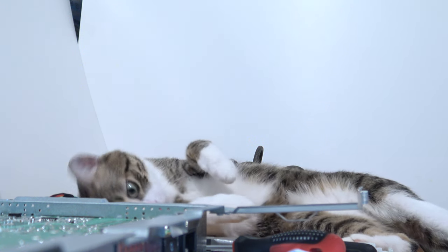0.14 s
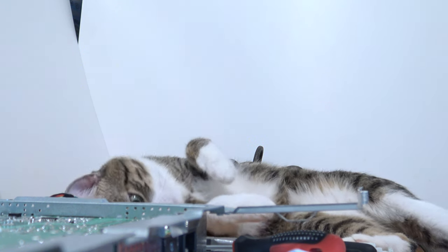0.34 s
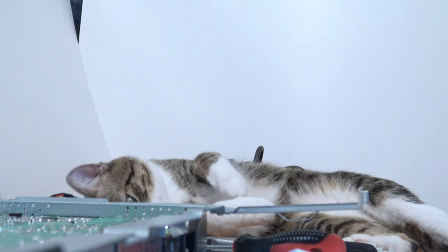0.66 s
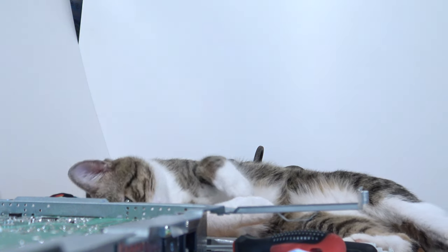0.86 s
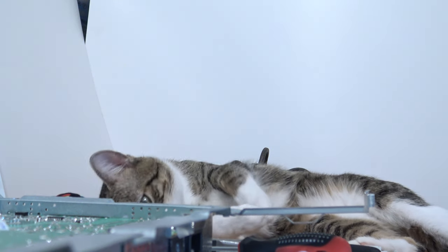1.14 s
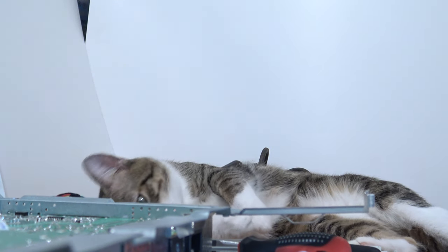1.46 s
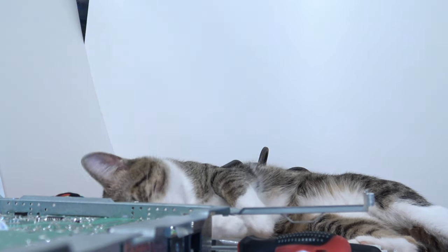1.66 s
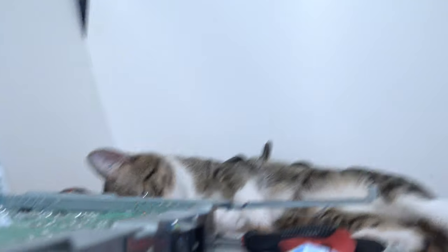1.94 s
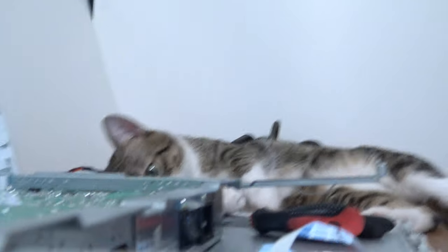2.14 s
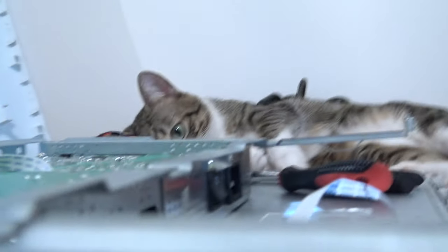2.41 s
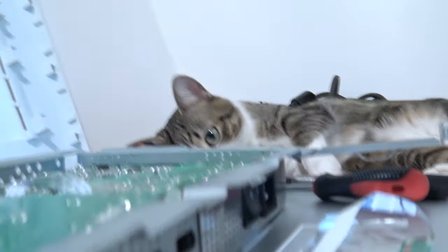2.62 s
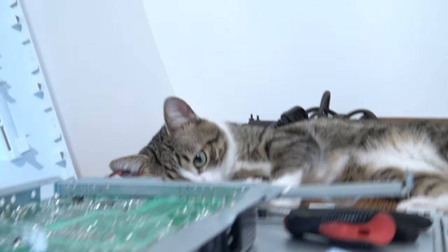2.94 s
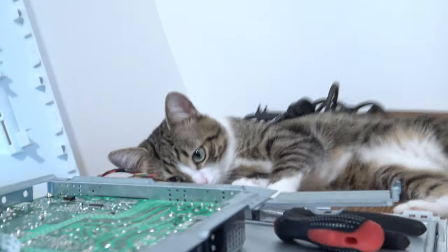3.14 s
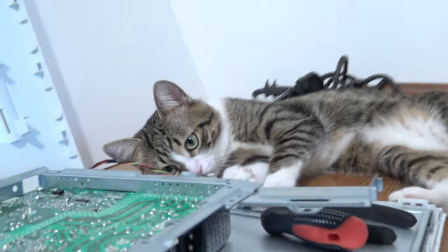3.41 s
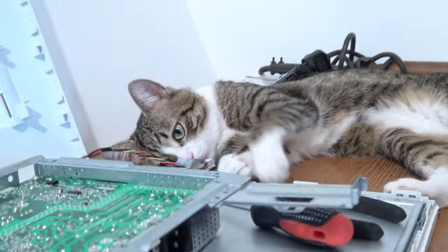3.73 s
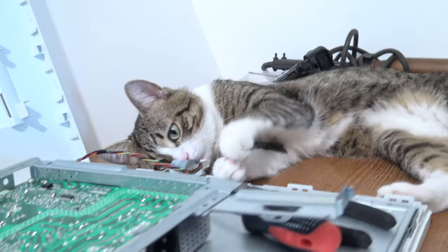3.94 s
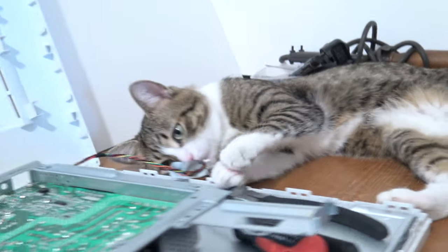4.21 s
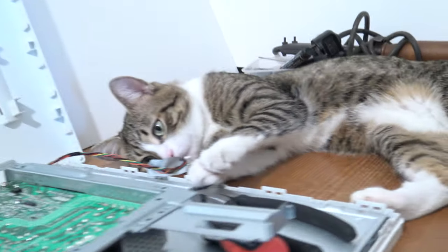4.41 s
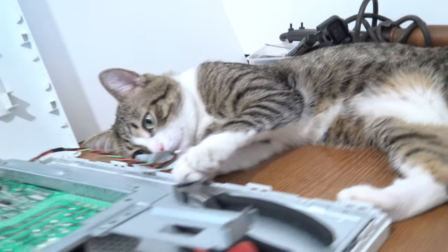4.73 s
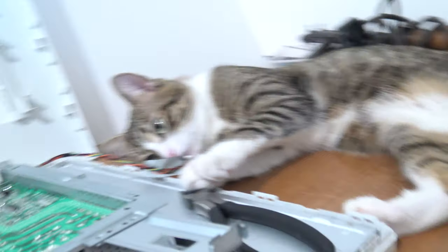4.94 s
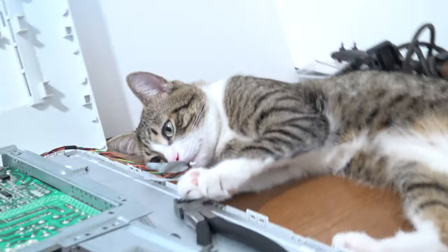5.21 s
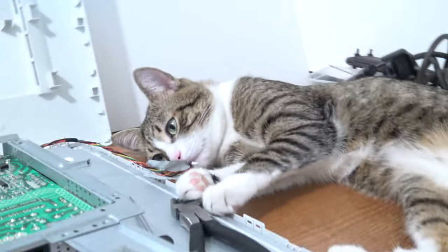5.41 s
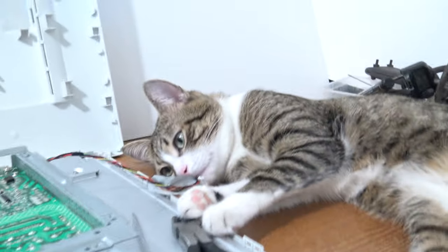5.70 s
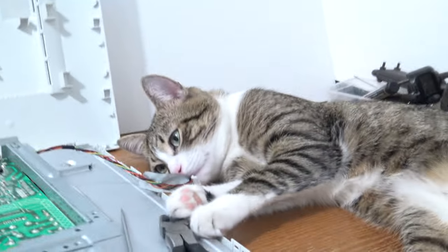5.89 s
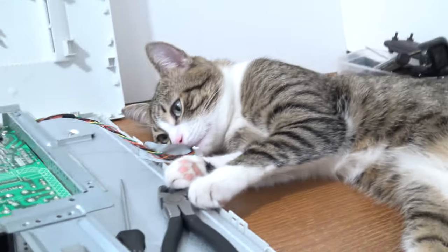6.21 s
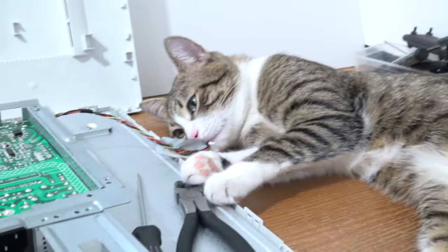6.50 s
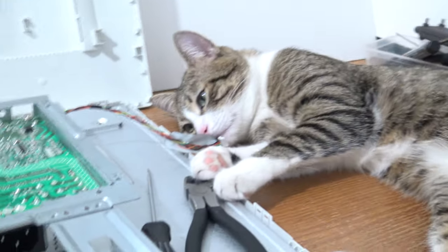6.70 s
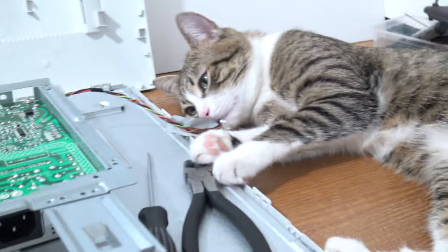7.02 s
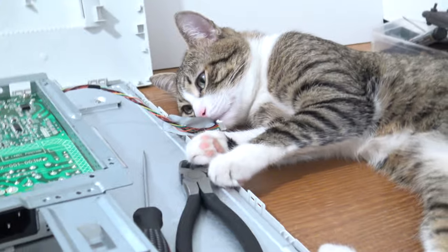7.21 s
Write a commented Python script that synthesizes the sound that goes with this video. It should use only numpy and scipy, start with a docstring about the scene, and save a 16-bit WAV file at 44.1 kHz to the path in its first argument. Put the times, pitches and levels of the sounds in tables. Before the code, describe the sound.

In a quiet small room, a close hand-held microphone hears a cat nudging a metal frame and loose tools. Almost nothing at first, then a few faint ticks, a dense rattling flurry with scrapes around two seconds, a couple of loud sharp knocks, then scattered single clacks and soft paw thuds on wood. Faint hiss lies underneath.

```python
"""A small bare room with a wooden floor: a cat lies among wires, tools and a sheet-metal frame.
Claws and loose parts tap the frame: short pitched swings, rattling noise and weak ringing.
Paws and fur drag in grains of noise with low thumps; paws thud on the boards, and the room echoes.
Underneath lie shaped noise for room tone and microphone hiss, a narrow noisy hum, and the faint
switched tones of the focus motor in a close, hand-held camera."""
import sys
import numpy as np
from scipy import signal
from scipy.fft import rfft, irfft, next_fast_len
from scipy.io import wavfile
from scipy.ndimage import uniform_filter1d

SR = 44100
rng = np.random.default_rng(int(sys.argv[2]) if len(sys.argv) > 2 else 0)


def dump(signal):
    """Clip the signal to [-1, 1] and save it as 16-bit WAV at the path in sys.argv[1]."""
    limited = np.clip(np.atleast_2d(signal).T, -1, 1)
    pcm = np.round(limited * 32767).astype(np.int16)
    wavfile.write(sys.argv[1], SR, pcm)


N = 324135  # length in samples

# Room tone and hiss: (frequency [Hz], relative level per Hz [dB])
TONE_SPECTRUM = [(20, -29), (35, -15.5), (50, 3.5), (95, -8), (140, 1), (240, -7), (310, -2), (420, -6),
                 (950, -8), (1400, -16), (1700, -14), (3200, -19), (14900, -21), (16500, -32)]
TONE_DB = -64
# A wash of air: (frequency [Hz], relative level per Hz [dB])
WASH_SPECTRUM = [(40, 1), (300, -2), (1500, -5), (2500, -13), (9000, -16), (16000, -29)]
# Left-right likeness of the tone and the wash: (frequency [Hz], likeness [0 to 1])
LIKENESS = [(60, 1), (180, 0.73), (550, 0.88), (1650, 0.93), (4970, 0.92), (15000, 0.46)]
# A narrow hum in the room: (frequency [Hz], width [Hz], level before the changes below [dB])
HUM = (1165, 48, -72.5)
# As the camera is carried round: (time [s], wash level [dB], hum change [dB])
CARRY = [(0, -68.5, -4), (.3, -64, -19), (0.651, -68, -5), (2.6, -72.5, -13), (3.5, -67, -1),
         (7.35, -78, -1)]

# Drags of paws and fur; levels are those before the stroke shapes them:
# (time [s], rise [s], time to fall 20 dB [s], scrape level [dB], scrape pitch [Hz],
#  thump level [dB], fur hiss level [dB]); very short or negative rises and falls get a floor in drag()
DRAGS = [(0.25, 0.042, -0.27, -66, 1500, -64, -61.5), (0.938, 0.024, 0.03, -54.5, 890, -52.5, -60.5),
         (0.975, 0.023, 0.14, -51.5, 1030, -49, -64.5), (1.711, 0.0052, 0.07, -51, 745, -71, -49.5),
         (1.873, 0.013, 0.22, -47.5, 1160, -46.5, -61), (1.926, 0.026, 0, -52, 890, -48, -86),
         (2.047, 0.0033, 0.0753, -45.5, 1220, -47.5, -56), (2.143, .01, 0.9, -76, 2760, -61, -62.5),
         (2.202, 0.0048, 0.2, -49.5, 860, -54.5, -57.5), (2.231, 0.0085, 0.01, -52.5, 1210, -55, -72),
         (2.288, .01, 0.02, -50.5, 920, -47.5, -62), (2.378, 0.023, 0.19, -55, 1190, -56, -61.5),
         (3.845, 0.023, -0.06, -45, 1190, -38, -50.5), (3.974, 0.006, 0.07, -53.5, 1280, -72.5, -66),
         (6.415, 0.013, 0.18, -68.5, 2330, -62.5, -66.5), (6.662, 0.04, 0.0546, -46.5, 1080, -66, -88),
         (6.871, 0.0051, 0.07, -52.5, 2380, -78, -69)]
# A heavier drag holds longer and thumps lower; each pair is (light, heavy)
LIGHT_DB, HEAVY_DB = -47, -37.5  # thump level
HOLD_S, THUMP_HZ = (0.011, 0.069), (270, 169)
# Ways the metal frame rings: (frequency [Hz], relative level [dB])
FRAME_MODES = [(300, -33), (680, 4.5), (830, 6), (960, 0.5), (1250, -1), (2160, 3.5), (2650, 7), (3600, 2),
               (5050, 3), (6450, -0.5)]

# How long the room's echo takes to fall 60 dB: (frequency [Hz], time [s])
ROOM_DECAY = [(200, 0.26), (1500, 0.17), (5000, 0.21), (15000, 0.15)]

# Taps of claws and loose parts on the frame:
# (time [s], knock pitch [Hz], knock peak [dB], click pitch [Hz], click peak [dB])
TAPS = [(0.8235, 910, -65, 5330, -58.5), (0.8882, 426, -65, 10200, -53), (0.8972, 433, -66, 9720, -49.5),
        (0.9124, 980, -46, 2740, -37.5), (0.9174, 1010, -41.5, 5550, -39.5), (0.9549, 680, -54, 5940, -51),
        (1.7763, 1430, -46.5, 2280, -34), (1.849, 850, -28.5, 1600, -37), (1.8854, 1340, -41, 2600, -38),
        (1.9063, 950, -31.5, 2440, -30.5), (1.9498, 520, -33, 2400, -38.5), (2.014, 756, -42, 2200, -22),
        (2.0458, 756, -25.5, 2080, -21.5), (2.0489, 780, -37, 4150, -22.5), (2.1507, 700, -58, 4200, -47),
        (2.2128, 684, -33.5, 2960, -39), (2.244, 660, -39.5, 1870, -42), (2.2835, 1180, -35, 2270, -37),
        (2.2997, 786, -46, 9700, -45), (2.3247, 695, -52, 6500, -45), (2.3754, 1030, -62, 4560, -45),
        (2.404, 690, -42.5, 5000, -36.5), (2.476, 917, -28.5, 3490, -16), (2.567, 700, -66, 8500, -56),
        (2.6063, 917, -16, 1690, -16.5), (2.6452, 1314, -32, 2570, -22.5), (2.7428, 935, -49.5, 2090, -36),
        (3.1581, 1145, -21.5, 6580, -15.5), (3.313, 1260, -49.5, 3220, -47.5),
        (3.492, 765, -52.5, 2930, -46), (3.7667, 1270, -45.5, 5260, -41), (3.8388, 700, -59, 6630, -48),
        (3.95, 1160, -48.5, 7050, -43.5), (3.9869, 920, -36.5, 1640, -55), (4.38, 1490, -52, 1580, -58),
        (4.3848, 930, -46.5, 1580, -60), (4.5275, 1320, -53, 3630, -46), (4.5937, 700, -61, 3950, -44),
        (4.8183, 930, -50, 1820, -60), (4.8685, 940, -22, 2960, -28.5), (4.9229, 790, -47, 1680, -50.5),
        (5.2072, 970, -46.5, 2580, -39), (5.2577, 1070, -51, 2220, -48), (5.702, 920, -21.5, 1680, -22),
        (6.2874, 1090, -52.5, 1930, -60), (6.3725, 824, -31.5, 3090, -35), (6.4143, 840, -46, 2190, -60),
        (6.6969, 855, -40, 2060, -41), (6.7178, 950, -28.5, 1640, -46), (7.207, 1330, -44.5, 2300, -32)]
# Harder contacts click higher and tick louder; without extra firmness, tick equals click at EVEN_HZ
EVEN_HZ, TICK_DB_PER_OCTAVE = 4220, 13
FIRM_DB, TICK_PER_DB = -31, 1.08  # knocks above FIRM_DB sharpen the tick further (dB per dB)
TICK_TOP_DB = 2.5  # the most that a tick stands over its click

# Thuds of a paw on the boards: (time [s], knock peak [dB])
THUDS = [(1.0112, -46), (2.309, -43), (2.838, -54), (3.6859, -53), (4.553, -31), (4.6407, -40.5),
         (6.0451, -32.5)]
# Pads are soft: the click lies far under the knock
THUD_HZ, THUD_CLICK_HZ, THUD_CLICK_DB = 343, 2820, -20.5

# Thin tones of the focus motor: (frequency [Hz], level before the motor's gain and changes [dB])
MOTOR_TONES = [(6475.5, -84), (8076, -81), (9676.5, -85), (11277, -99)]
# How strongly the motor sounds: (time [s], level change [dB])
MOTOR_RUN = [(2.55, -29.5), (2.7, -9), (3.0, -7), (3.3, -2), (3.8, -2.5), (3.9, -22)]
STEP_HZ, STEP_ON, STEP_START = 25, .44, .74  # bursts a second, share on, start as part of a cycle

# Balance of the two microphone ports: (frequency [Hz], left minus right [dB])
PORT_LEAN = [(60, 0), (110, 2), (200, -2), (380, -1.5), (700, -3.5), (1290, -2.5), (2380, 1.5),
             (4400, -0.5), (8120, 0), (15000, -0.5)]
EDGE_HZ = 16450  # the sound is cut above this


def gain_of(db):
    """Turns decibels into a multiplier."""
    return 10 ** (np.asarray(db) / 20)


def evened(x):
    """Scales a sound to an rms (average strength) of 1."""
    return x / np.sqrt(np.mean(x ** 2) + 1e-20)


def peaked(x):
    """Scales a sound to a peak of 1."""
    return x / (abs(x).max() + 1e-20)


def read(points, hz):
    """Reads between the points of a frequency table, on a log axis."""
    f, value = np.transpose(points)
    return np.interp(np.log(hz + 1), np.log(f + 1), value)


def band(x, low_hz, high_hz, order):
    """Keeps the frequencies between two edges."""
    edges = (low_hz, min(high_hz, SR / 2.1))
    return signal.sosfilt(signal.butter(order, edges, "band", fs=SR, output="sos"), x)


def wavelet(hz, cycles, t):
    """A swing that builds and dies within a few cycles."""
    u = t * hz / cycles
    return peaked(u * np.exp(-u) * np.sin(2 * np.pi * hz * t))


def add(mix, s, sound):
    """Mixes a sound in, starting at s seconds."""
    part = mix[:, round(s * SR):][:, :sound.shape[1]]
    part += sound[:, :part.shape[1]]


def airy(spectrum, patchy_db):
    """Stereo noise built from short random spectra, with drifting louder and softer patches."""
    frames, hz = N // 256 + 5, np.fft.rfftfreq(1024, 1 / SR)
    a, b, c, d, patches = rng.standard_normal((frames, 513, 5)).T
    patches = uniform_filter1d(patches, size=10, axis=0)
    patches = evened(uniform_filter1d(patches, size=12, axis=1))
    same = np.clip(read(LIKENESS, hz), -1, 1)[:, None]
    left = a + 1j * b
    right = same * left + np.sqrt(1 - same ** 2) * (c + 1j * d)
    level_db = read(spectrum, hz)[:, None] + patchy_db * patches
    spectra = np.array([left, right]) * gain_of(level_db)
    return evened(signal.istft(spectra, nperseg=1024, noverlap=768)[1][:, :N])


def room_tone():
    """Steady hiss and rumble, with a wash and a narrow hum that change as the camera is carried."""
    s, wash_db, hum_db = np.transpose(CARRY)
    t = np.arange(N) / SR
    hz, width, db = HUM
    hum = evened(signal.lfilter(*signal.iirpeak(hz, hz / width, SR), rng.standard_normal(N)))
    hum = hum * gain_of(db + np.interp(t, s, hum_db))
    hum = hum * gain_of([[-2.], [2.]])  # softer on the left, louder on the right
    tone = gain_of(TONE_DB) * airy(TONE_SPECTRUM, 0.97)
    wash = gain_of(np.interp(t, s, wash_db)) * airy(WASH_SPECTRUM, 1.66)
    return tone + wash + hum


def frame_ring(size):
    """The frame struck at a random spot: each mode gets its own share; high modes die sooner."""
    hz, db = np.transpose(FRAME_MODES)
    t = np.arange(size)[:, None] / SR
    t60 = 1.1 / np.sqrt(hz)  # seconds to fall 60 dB
    share_db = 3 * rng.standard_normal(len(hz))
    modes = gain_of(db + share_db - 60 * t / t60) * np.sin(2 * np.pi * hz * t)
    return modes.sum(1)


def drag(rise, fall, scrape_db, scrape_hz, thump_db, hiss_db):
    """Fur and pads slip in fine uneven grains; the frame tints them and the floor thumps below."""
    hold = np.interp(thump_db, (LIGHT_DB, HEAVY_DB), HOLD_S)
    thump_hz = np.interp(thump_db, (LIGHT_DB, HEAVY_DB), THUMP_HZ)
    rise, fall = max(rise, .002), max(fall, .01)
    t = np.arange(0, rise + hold + 2 * fall, 1 / SR)
    stroke = gain_of(np.interp(t, [0, rise, rise + hold, t[-1]], [-20, 0, 0, -40]))

    slip_now = rng.random(len(t)) < 4000 / SR  # about 4000 grains a second
    strength = gain_of(2.83 * np.minimum(rng.exponential(1, len(t)), 5))
    slips = slip_now * strength * rng.standard_normal(len(t))
    tinted = slips + .009 * signal.fftconvolve(slips, frame_ring(size=2048))[:len(t)]

    scrape = evened(band(tinted, scrape_hz * 0.71, scrape_hz * 1.495, order=2))
    scrape = scrape + 0.68 * evened(band(tinted, 1750, 2500, order=1))
    thump = band(slips, thump_hz * 0.55, thump_hz * 2.2, order=2)
    rumble = band(slips, 35, 98, order=2)  # the floor boards carry the drag to the camera
    rumble_db = min(thump_db, LIGHT_DB) - 5.0
    fur = evened(tinted) + 0.5 * rng.standard_normal((2, len(t)))
    hiss = band(band(fur, 1720, 11700, order=2), 1700, 6900, order=1)
    parts = ((scrape_db, scrape), (thump_db, thump), (hiss_db, hiss), (rumble_db, rumble))
    return stroke * sum(gain_of(db) * evened(x) for db, x in parts)


def room(x):
    """Sparse echoes, randomly flipped in sign; each frequency band dies at its own speed."""
    size = SR // 2
    echoes = np.zeros((2, size))
    spots = np.arange(160, size - 20, 20)
    at = spots + rng.integers(0, 20, (2, len(spots)))
    np.put_along_axis(echoes, at, rng.choice([-1., 1.], at.shape), 1)
    echoes[1] = 0.95 * echoes[0] + 0.33 * echoes[1]  # the two sides are much alike
    hz, t, spectra = signal.stft(echoes, SR, nperseg=256)
    t60 = np.maximum(read(ROOM_DECAY, hz), .02)[:, None]
    tail = signal.istft(spectra * gain_of(-60 * t / t60), SR, nperseg=256)[1]
    return signal.fftconvolve(x[None], tail / np.linalg.norm(tail[0]), axes=1)[:, :N]


def tap(knock_hz, knock_db, click_hz, click_db):
    """A dead knock of the struck part, a brief rattling contact, and the frame ringing weakly."""
    octaves = np.log2(click_hz / EVEN_HZ)
    firmness_db = max(knock_db - FIRM_DB, 0)
    tick_db = click_db + TICK_DB_PER_OCTAVE * octaves + TICK_PER_DB * firmness_db
    tick_db = min(tick_db, click_db + TICK_TOP_DB)

    t = np.arange(4096) / SR
    shared, apart, shake = rng.standard_normal((3, len(t)))
    shape = (1 - np.exp(-t / 0.00039)) * (np.exp(-t / 0.0012) + 0.095 * np.exp(-t / 0.0065))
    contact = shape * (shared + np.outer([.35, -.35], apart))  # the ports hear it differently
    ring = np.convolve(contact[0, :256], frame_ring(size=len(t)))[:len(t)]

    # Loose parts shake on after the knock
    after = band(shake * np.exp(-t * knock_hz / 4.1), knock_hz * 0.67, knock_hz * 1.52, order=2)
    knock = wavelet(knock_hz, 0.77, t) + 0.86 * peaked(after)

    rattle = peaked(contact) + 0.24 * wavelet(click_hz, 1.6, t) + 0.12 * peaked(ring)
    click = band(rattle, max(1930., 0.57 * click_hz), max(4800., 1.47 * click_hz), order=2)
    middle = click.mean(0)
    click = middle + 0.28 * (click - middle)  # bring left and right closer together
    tick = band(rattle, 3230, 13800, order=2)
    tick = band(tick, 2170, max(6800., 0.68 * click_hz), order=1)
    parts = ((knock_db, knock), (click_db, click), (tick_db, tick))
    return sum(gain_of(db) * peaked(x) for db, x in parts)


def thud(db):
    """A soft paw on the boards: a low knock with only a faint click."""
    return tap(THUD_HZ, db, THUD_CLICK_HZ, db + THUD_CLICK_DB)


def focus_motor():
    """Thin tones switched on and off as the lens steps."""
    t = np.arange(N) / SR
    on = 1. * ((t * STEP_HZ - STEP_START) % 1 < STEP_ON)
    on = uniform_filter1d(on, size=90)  # soften the switching
    tones = sum(gain_of(db) * np.sin(2 * np.pi * (hz * t + rng.random())) for hz, db in MOTOR_TONES)
    run_db = np.interp(t, *np.transpose(MOTOR_RUN), left=-80, right=-80)
    return 4.1 * tones * on * gain_of(run_db)


def scene():
    """Drags, taps and thuds with their room echo, over the room tone and the motor."""
    cat = np.zeros((2, N))
    for s, *settings in DRAGS:
        add(cat, s, drag(*settings))
    for s, *settings in TAPS:
        add(cat, s, tap(*settings))
    for s, db in THUDS:
        add(cat, s, thud(db))
    echo = gain_of(-16.5) * room(cat.mean(0))
    return cat + echo + room_tone() + focus_motor()


def record(dry):
    """The two microphone ports favour different bands; then the highest treble is cut."""
    size = next_fast_len(N)
    lean_db = read(PORT_LEAN, np.fft.rfftfreq(size, 1 / SR))
    lean = gain_of(np.outer([.5, -.5], lean_db))  # half of the difference to each side
    ports = irfft(rfft(dry, size) * lean, size)[:, :N]
    treble_cut = signal.firwin(255, EDGE_HZ, window=("kaiser", 9), fs=SR)
    return signal.oaconvolve(ports, treble_cut[None], "same")


dry = scene()
out = record(dry)
dump(out)
```